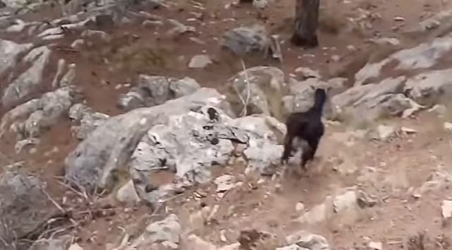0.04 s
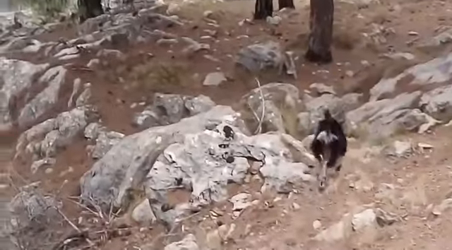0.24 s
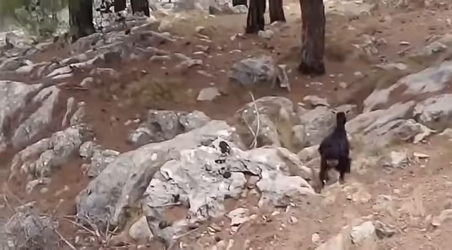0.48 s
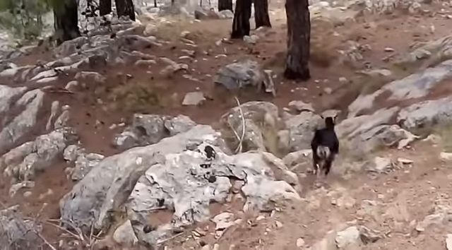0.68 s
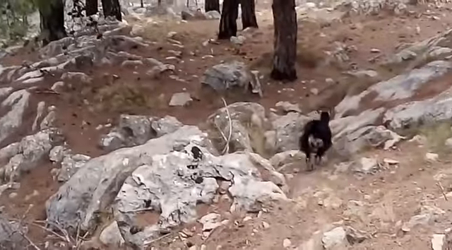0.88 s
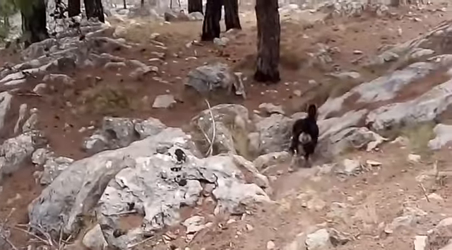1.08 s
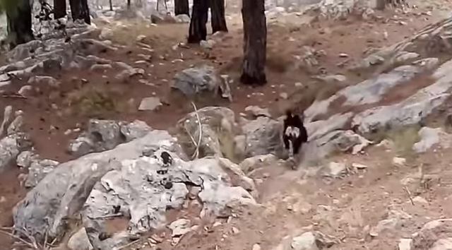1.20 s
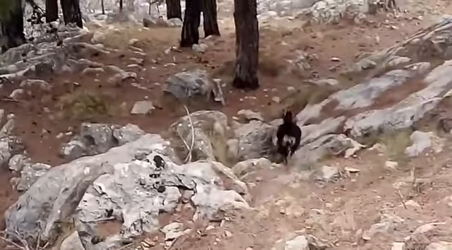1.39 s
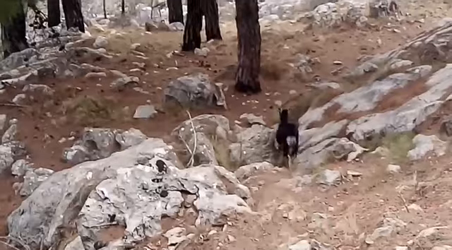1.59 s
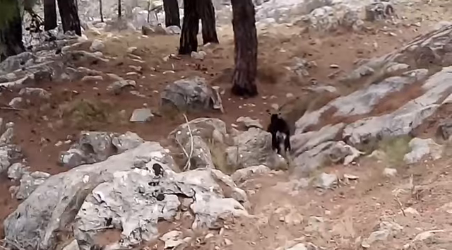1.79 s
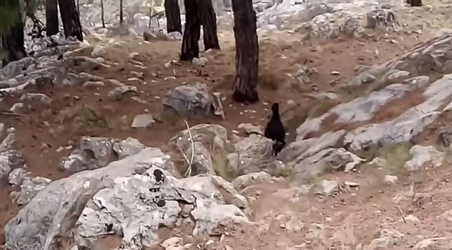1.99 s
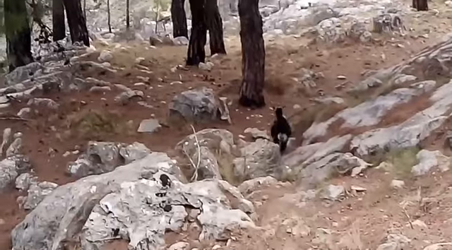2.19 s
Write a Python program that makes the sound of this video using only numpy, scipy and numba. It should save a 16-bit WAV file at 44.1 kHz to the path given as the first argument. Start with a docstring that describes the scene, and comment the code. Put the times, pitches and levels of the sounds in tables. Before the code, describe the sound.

One raspy, trembling goat bleat, with hooves scuffing over stones and wind on the microphone.

```python
"""On a dry, stony slope, a running goat gives one long, quavering bleat.
Its vocal folds and breath make its throat ring; each throb climbs in pitch and breaks into a rasp,
and the rocks echo it. Hooves click on loose stones and scuff through grit.
Wind buffets the microphone, there is one soft bump, and something like a far goat bell
rings faintly over the hiss of the hillside."""
import sys
import numpy as np
from scipy import signal
from scipy.fft import rfft, irfft
from scipy.io import wavfile
from scipy.ndimage import uniform_filter1d
from numba import njit

SR = 44100
rng = np.random.default_rng(int(sys.argv[2]) if len(sys.argv) > 2 else 0)


def generate_wav(signal):
    """Clip the signal to [-1, 1] and save it as 16-bit WAV at the path in sys.argv[1]."""
    frames = np.transpose(np.atleast_2d(signal))
    scaled = np.clip(frames, -1, 1) * 32767
    pcm = np.round(scaled).astype(np.int16)
    wavfile.write(sys.argv[1], SR, pcm)


N = 99225

# tone of the hillside hiss and of the wind rumble (frequency [Hz], level [dB])
HISS_TONE = [(30, -1), (150, -5), (350, -4), (550, 2), (780, 1.5), (1100, -8), (1600, -12.5), (2400, -21),
             (3200, -14), (4000, -19.5), (4900, -5.5), (5800, -2.5), (6600, -12), (7400, -29.5),
             (8200, -30.5)]
RUMBLE_TONE = [(20, -28.5), (40, -11.5), (65, 3.5), (110, -2.5), (160, -10.5), (250, -20.5), (450, -34.5),
               (1000, -61.5)]
# how loud those two are over time (time [s], level [dB])
HISS_LEVELS = [(0, -54), (.75, -51.5), (1.6, -51.5), (1.75, -55), (2.1, -56), (2.25, -54)]
RUMBLE_LEVELS = [(0, -52), (.06, -50.5), (.15, -41), (.25, -39), (.4, -44.5), (.52, -50), (.62, -56),
                 (.72, -52), (.83, -63.5), (.95, -54), (1.12, -52), (1.3, -67), (1.4, -40.5), (1.55, -43),
                 (1.68, -34.5), (1.82, -39), (1.98, -42), (2.06, -61.5), (2.25, -50.5)]
# puffs of wind on the microphone (time [s], half length [s], level [dB], frequency [Hz])
WIND_PUFFS = [(0.172, 0.0064, -21.5, 106), (.2, 0.0047, -27, 97), (0.293, 0.01, -38.5, 87.6),
              (0.428, 0.042, -35.5, 94), (.47, 0.0075, -29, 102), (0.489, 0.013, -32, 91),
              (0.671, 0.0087, -33.5, 84.3), (1.453, 0.0086, -26, 85.3), (1.699, 0.0038, -21.5, 200),
              (1.712, 0.011, -26, 70.8), (1.728, 0.0032, -18, 167.7), (1.739, 0.012, -25, 100),
              (1.785, 0.0095, -25.5, 92), (1.856, 0.013, -33, 94.1), (1.959, 0.0092, -28, 71.6),
              (2.156, 0.007, -45.5, 96), (2.213, 0.0091, -36.5, 95)]
# hooves sliding (time [s], rise [s], decay [s], level [dB], dullness [0-1])
HOOF_SLIDES = [(.02, 0.016, 0.04, -50, 0.43), (0.131, 0.056, 0.054, -40.5, 0.53),
               (.35, 0.02, 0.058, -48, 0.12), (.437, 0.019, 0.015, -39, 0.39),
               (.475, 0.017, 0.28, -45.5, 0.65), (.74, 0.011, 0.18, -57, 0.9),
               (1.62, 0.016, 0.013, -53.5, 1), (2.205, 0.023, 0.027, -55, 0.54)]
# hooves hitting stones (time [s], peak level [dB])
HOOF_HITS = [(0.0853, -21), (.0922, -39), (0.1156, -27.5), (0.188, -25.5), (0.4408, -15), (.4435, -29),
             (.4735, -38), (0.5172, -29), (.565, -32), (0.584, -30.5), (0.6006, -38), (0.6505, -23),
             (1.433, -26), (1.618, -32), (2.2026, -39), (2.21, -55)]
# tone of bright grit, dull crunch and a struck stone (frequency [Hz], level [dB])
GRIT_TONE = [(2500, -33.5), (4400, -20.5), (5200, -8.5), (5850, 0), (6600, -5), (7300, -10), (8200, -18.5)]
CRUNCH_TONE = [(200, -22.5), (500, 2.5), (1200, 0.5), (2000, -3), (3000, 0.5), (4200, -3.5), (5500, -5),
               (7500, -25)]
STONE_TONE = [(300, -15), (900, -5), (1800, -15), (2900, -9), (4100, -17), (5000, -12), (5900, 8.5),
              (6700, 2), (7500, -5.5), (8500, -13.5)]
# rings of the bell (time [s], low note [dB], high note [dB])
BELL_RINGS = [(0.138, -50.5, -55.5), (0.292, -51, -54), (0.549, -63.5, -49), (0.767, -50.5, -48),
              (1.934, -59, -53.5)]
# throbs of the bleat (start [s], peak time [s], peak pitch [Hz], rasp [0-1], low band [dB],
# nose band [dB], middle band [dB], top band [dB], top band swell [dB/s], middle band at peak [Hz])
BLEAT_THROBS = [(.803, .843, 362.2, 0.47, -52, -47.5, -33.5, -49.5, 57.5, 3310),
                (.893, .948, 384.5, .85, -38, -37.5, -28, -28, 477, 3344),
                (.995, 1.049, 336.7, .2, -45, -40, -36, -42, 56, 3120),
                (1.062, 1.154, 345.3, 0.13, -46, -39, -33.5, -40, 36, 3340),
                (1.186, 1.256, 343.7, .55, -44.5, -43, -35.5, -36.5, 47, 3345),
                (1.338, 1.369, 324.5, .35, -47.5, -52, -39.5, -54, 62, 3370),
                (1.424, 1.463, 355.4, 0.56, -41, -43, -33.5, -36, 239, 2920),
                (1.489, 1.558, 305.8, 0.4, -51.5, -52.5, -45, -41.5, 20, 3380)]
# the four bands in which the throat and nose ring (frequency [Hz], level [dB])
LOW_BAND = [(200, -47.5), (330, -3.5), (480, -15.5), (620, -12), (735, 3), (900, -7.5), (1130, -3),
            (1320, -0.5), (1520, -4), (1800, -15.5), (2500, -48.5)]
NOSE_BAND = [(1000, -32), (1450, -15.5), (1560, 0.5), (1670, 1), (1810, -26), (2040, -1.5), (2250, -10),
             (2550, -8.5), (3000, -43.5)]
MIDDLE_BAND = [(1900, -39.5), (2550, -8), (2920, 2.5), (3300, -3), (3700, 1), (4000, -4.5), (4500, -6),
               (5300, -39.5)]
TOP_BAND = [(3400, -37.5), (4200, -17), (4750, 3), (5250, 1), (5950, -2.5), (6450, -13.5), (7000, -20),
            (7700, -37)]


def undb(db):
    """Turn decibels into a factor to multiply by."""
    return 10 ** (np.asarray(db) / 20)


def unit(x):
    """Scale a sound to an average (rms) size of 1."""
    return x / np.sqrt(np.mean(x ** 2) + 1e-18)


def noise():
    """White noise: an even hiss."""
    return rng.standard_normal(N)


def colour(x, tone):
    """Make some frequencies louder and others softer, following a tone table."""
    size = 2 ** 17
    hz, db = np.array(tone).T
    all_hz = np.arange(size // 2 + 1) * SR / size
    gain = undb(np.interp(np.log(all_hz + 1), np.log(hz), db))
    # make the filter ring only after a sound, never before it
    cepstrum = irfft(np.log(gain))
    cepstrum[1:size // 2] *= 2
    cepstrum[size // 2 + 1:] = 0
    return irfft(rfft(x, size) * np.exp(rfft(cepstrum)))[:N]


def swell(t, at, rise, decay):
    """A smooth rise to a peak, then a fade."""
    return np.exp(-(np.minimum(t - at, 0) / rise) ** 2 - np.maximum(t - at, 0) / decay)


def even(x):
    """Even out the loudness of a rumble, keeping its wandering pitch."""
    loudness = np.abs(signal.hilbert(unit(x)))
    return unit(x / np.sqrt(loudness ** 2 + .5))


def hillside(t):
    """Air hisses softly through pines and dry grass."""
    return unit(colour(noise(), HISS_TONE)) * undb(np.interp(t, *np.array(HISS_LEVELS).T))


def wind(t):
    """Wind rumbles, and short swirls of air thump the microphone."""
    half_width_octaves = .66
    out = even(colour(noise(), RUMBLE_TONE)) * undb(np.interp(t, *np.array(RUMBLE_LEVELS).T))
    for at, half_length, db, hz in WIND_PUFFS:
        edges_hz = hz * 2 ** (half_width_octaves * np.array([-1, 1]))
        band = signal.butter(3, edges_hz, "band", fs=SR, output="sos")
        shape = np.exp(-.5 * ((t - at) / half_length) ** 2)
        puff = even(signal.sosfilt(band, noise())) * shape
        out += undb(db) * puff * np.linalg.norm(shape) / np.linalg.norm(puff)
    return out


def grains(tone, per_second=3500, spread_db=2.5):
    """Loose grains make thousands of tiny ticks, some louder than others."""
    ticks = noise() * (rng.random(N) < per_second / SR)
    sizes = undb(spread_db * np.minimum(rng.exponential(size=N), 4))
    return unit(colour(ticks * sizes, tone))


def hoof_scuffs(t):
    """Sliding hooves stir up bright grit and duller crunch."""
    grit, crunch = grains(GRIT_TONE), grains(CRUNCH_TONE)
    out = np.zeros(N)
    for at, rise, decay, db, dullness in HOOF_SLIDES:
        gravel = np.sqrt(1 - dullness ** 2) * grit + dullness * crunch
        out += undb(db) * swell(t, at, rise, decay) * gravel
    return out


def hoof_knocks(t):
    """Each hoof hits stone with one sharp click, followed by a trace of crumbs."""
    crumb_size, crumb_decay_s = .1, .002
    out = np.zeros(N)
    for at, db in HOOF_HITS:
        push = crumb_size * noise() * (t >= at) * np.exp(-np.abs(t - at) / crumb_decay_s)
        push[int(at * SR)] += 1  # the hit itself
        crack = colour(push, STONE_TONE)
        out += undb(db) * crack / np.abs(crack).max()
    return out


def bell(t):
    """A far bell rings with two faint notes at once, which die away quickly."""
    low_hz, high_hz, rise_s, decay_s = 729, 1222, .004, .044
    out = np.zeros(N)
    for at, low_db, high_db in BELL_RINGS:
        shape = swell(t, at + rise_s, rise_s, decay_s)
        for hz, db in ((low_hz, low_db), (high_hz, high_db)):
            out += undb(db) * shape * np.sin(2 * np.pi * (hz * t + rng.random()))
    return out


def thump(t):
    """One soft, hollow bump close to the microphone."""
    at, hz, db = .668, 241.8, -31.5
    return undb(db) * swell(t, at, rise=.0053, decay=.018) * np.sin(2 * np.pi * hz * (t - at))


@njit
def vocal_folds(hz, length_spread, size_spread, chance):
    """The folds give one pulse per cycle, each with its own length and size."""
    pulses, phase = np.zeros(len(hz) + 16), np.zeros(len(hz))
    progress, cycle = 0., 0
    for i in range(len(hz)):
        step = hz[i] * np.exp(length_spread[i] * chance[cycle, 0]) / SR
        progress += step
        if progress >= 1:
            progress, cycle = progress - 1, cycle + 1
            size = size_spread[i] ** chance[cycle, 1]
            for j in range(8):  # spread the pulse so it can land between samples
                offset = j - 4 + progress / step
                pulses[i + j] += size * np.sinc(offset) * np.cos(np.pi * offset / 8) ** 2
        phase[i] = progress  # how far through the cycle, 0-1
    return pulses[:len(hz)], phase


def voice(hz, rough):
    """Pulses mix with puffs of breath; a rougher voice is more uneven and more breathy."""
    waver_share, waver_s = .008, .00811  # quick, small wobbles in pitch
    length_spread, size_spread_db, breath = .085 * rough, 3.5 * rough, 1.5 * rough
    puff_decay_cycles = .79
    waver = unit(uniform_filter1d(noise(), size=int(waver_s * SR)))
    hz = hz * np.exp(waver_share * waver)
    chance = rng.standard_normal((N // 20, 2))
    pulses, phase = vocal_folds(hz, length_spread, undb(size_spread_db), chance)
    puffs = 2 * np.exp(-phase / puff_decay_cycles) * noise()
    return (pulses * np.sqrt(SR / hz) + breath * puffs) / np.sqrt(1 + breath ** 2)


@njit
def throat_ring(x, hz, width_hz):
    """The throat lets through a band of sound around a moving frequency."""
    out, band, low = np.empty(len(x)), 0., 0.
    for i in range(len(x)):
        tuning, damping = np.tan(np.pi * hz[i] / SR), width_hz / hz[i]
        ring = (band + tuning * (x[i] - low)) / (1 + tuning * (tuning + damping))
        band = 2 * ring - band
        low += 2 * tuning * ring
        out[i] = damping * ring
    return out


def bleat(t):
    """The voice makes the throat ring; each throb swells, climbs and turns hoarse at its peak."""
    rise_s, drop_s, linger_s, linger_share = .018, .006, .035, .35
    low_db_per_s, middle_db_per_s = 218.5, 102.5  # how fast the bands swell
    glide_hz_per_s, fall_s = 930, .04  # the pitch climbs to the peak, then falls briefly
    sink_hz_per_s, sink_s = 3300, .1  # the middle band sinks, then comes back twice as fast
    base_rough, rasp_lead_s = .12, .016
    hz, rough, middle_hz, low, nose, middle, top, total_weight = np.zeros((8, N))
    for (start, peak, pitch, rasp, low_db, nose_db, middle_db, top_db,
         top_db_per_s, peak_middle_hz) in BLEAT_THROBS:
        before, after = np.clip(peak - t, 0, peak - start), np.maximum(t - peak, 0)
        fade = (1 - linger_share) * np.exp(-after / drop_s) + linger_share * np.exp(-after / linger_s)
        shape = np.clip((t - start) / rise_s, 0, 1) * fade
        low += shape * undb(low_db - low_db_per_s * before)
        nose += shape * undb(nose_db - low_db_per_s * before)
        middle += shape * undb(middle_db - middle_db_per_s * before)
        top += shape * undb(top_db - top_db_per_s * before)
        weight = shape ** 2 + 1e-12  # the throb sounding now steers the voice
        hz += weight * (pitch - glide_hz_per_s * (before + np.minimum(after, fall_s)))
        rough += weight * (base_rough + rasp * np.exp(-(before / rasp_lead_s) ** 2))
        middle_hz += weight * (peak_middle_hz + sink_hz_per_s * np.minimum(before + 2 * after, sink_s))
        total_weight += weight
    buzz = voice(hz / total_weight, np.clip(rough / total_weight, 0, 1))
    out = middle * unit(throat_ring(colour(buzz, MIDDLE_BAND), middle_hz / total_weight, width_hz=490.))
    for gain, band in ((low, LOW_BAND), (nose, NOSE_BAND), (top, TOP_BAND)):
        out += gain * unit(colour(buzz, band))
    return out


def slope_echo(call, t):
    """A nearby rock face bounces the call back; stones and trunks scatter a short echo."""
    bounce_db, bounce_s = -12, .0135
    tail_db, gap_s, fade_s = -9, .017, .51  # the tail falls 60 dB in fade_s
    bounce = undb(bounce_db) * np.interp(t - bounce_s, t, call)
    tail = noise() * np.exp(-np.log(1000) * t / fade_s) * (t > gap_s)
    scattered = undb(tail_db) * signal.fftconvolve(call, tail / np.linalg.norm(tail))[:N]
    return call + bounce + scattered


def scene():
    """Goat, stones, wind, bump, bell and hillside, all at one microphone."""
    t = np.arange(N) / SR
    goat = slope_echo(bleat(t), t) + hoof_knocks(t) + hoof_scuffs(t)
    return (goat + wind(t) + thump(t) + bell(t) + hillside(t))[None]


def record(dry):
    """The recorder turns the high treble down, adds a trace of hiss and cuts off the very top."""
    treble_hz, treble_db, hiss_db, top_hz = 7090, -27.5, -81.5, 15800
    dull = signal.sosfiltfilt(signal.butter(10, treble_hz, fs=SR, output="sos"), dry)
    out = dull + undb(treble_db) * (dry - dull) + undb(hiss_db) * noise()
    return signal.sosfilt(signal.ellip(8, .2, 70, top_hz, fs=SR, output="sos"), out)


dry = scene()
out = record(dry)
generate_wav(out)
```